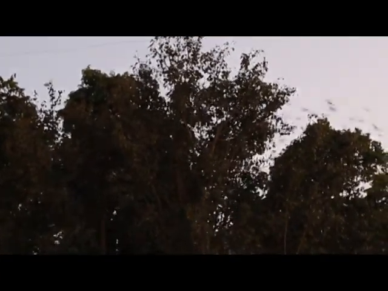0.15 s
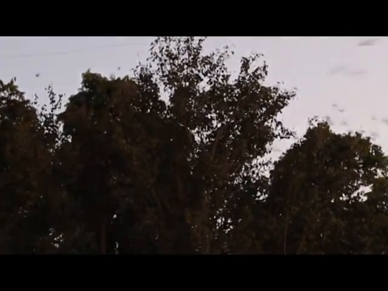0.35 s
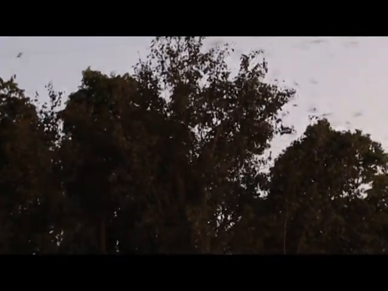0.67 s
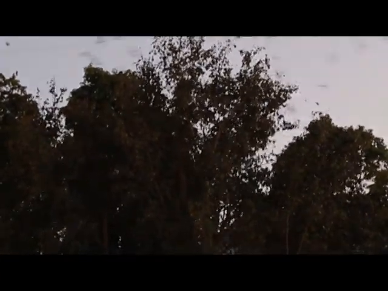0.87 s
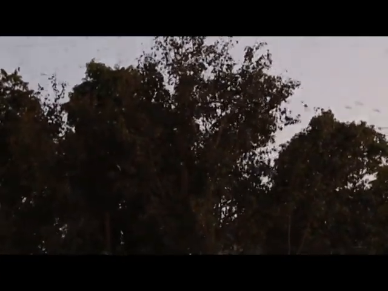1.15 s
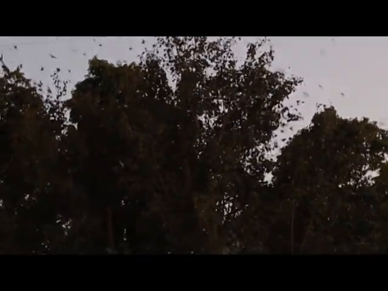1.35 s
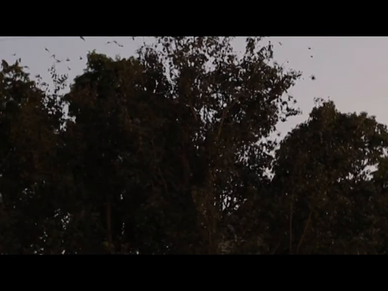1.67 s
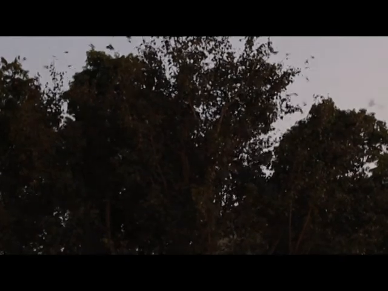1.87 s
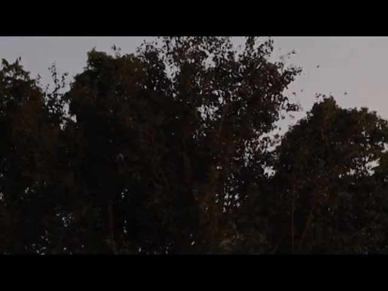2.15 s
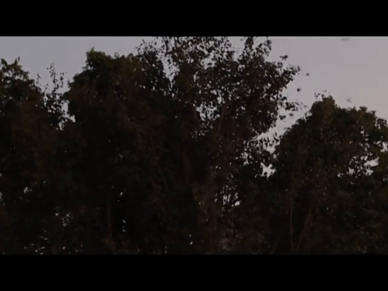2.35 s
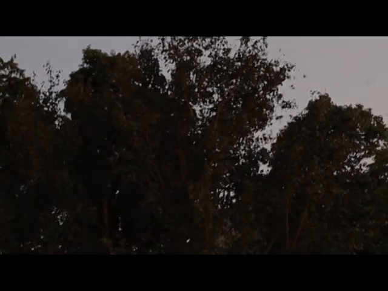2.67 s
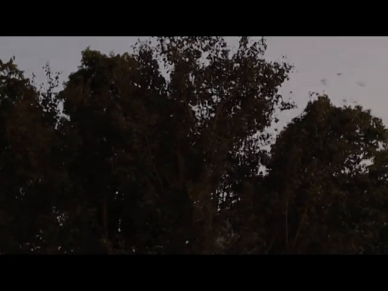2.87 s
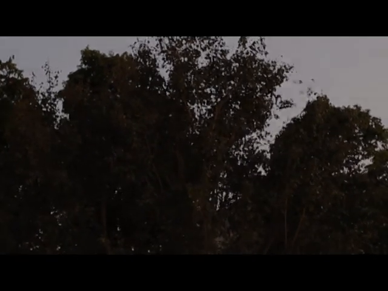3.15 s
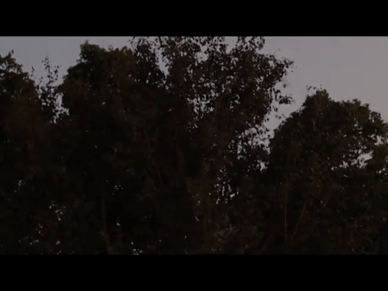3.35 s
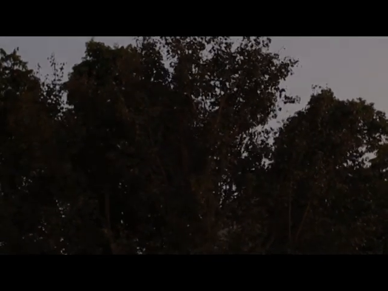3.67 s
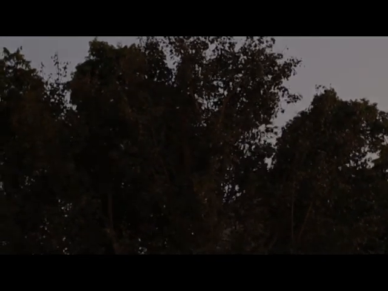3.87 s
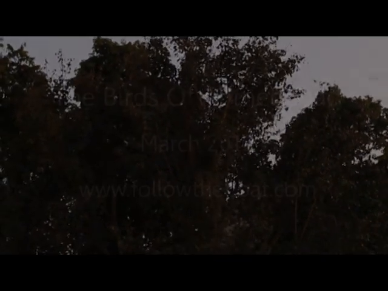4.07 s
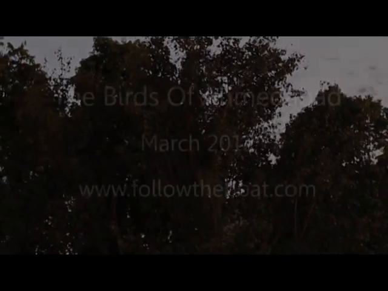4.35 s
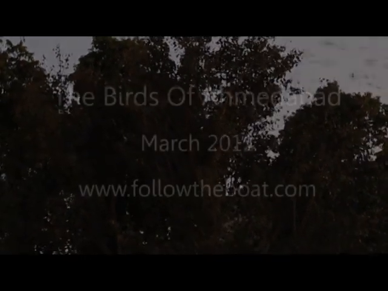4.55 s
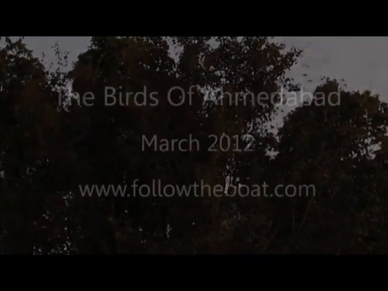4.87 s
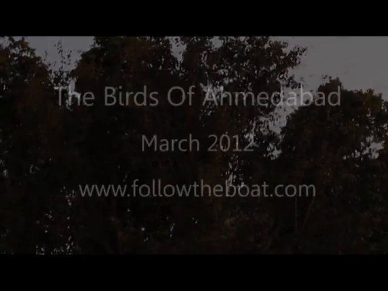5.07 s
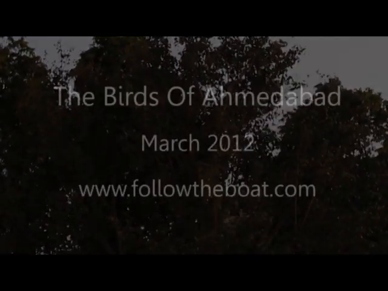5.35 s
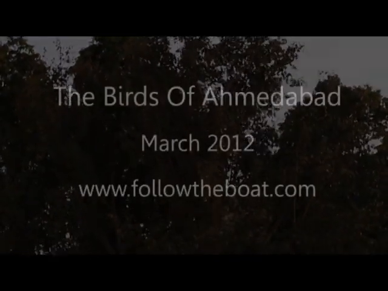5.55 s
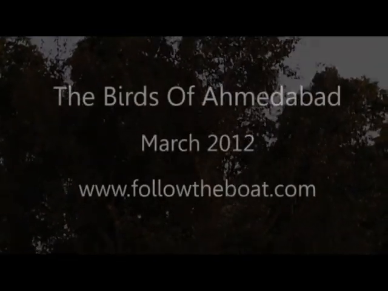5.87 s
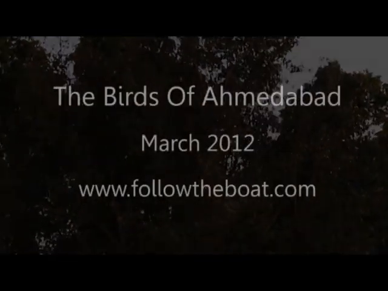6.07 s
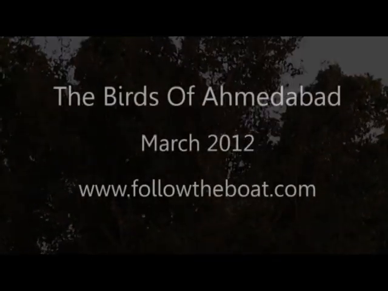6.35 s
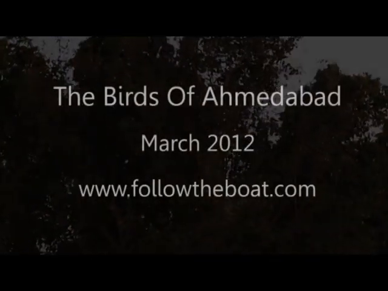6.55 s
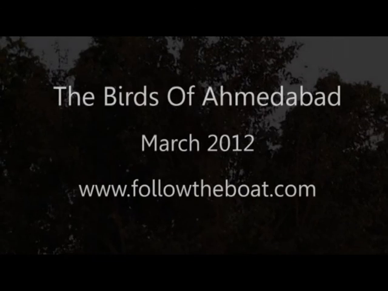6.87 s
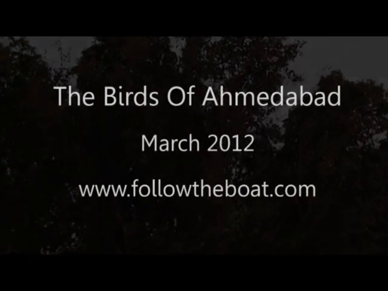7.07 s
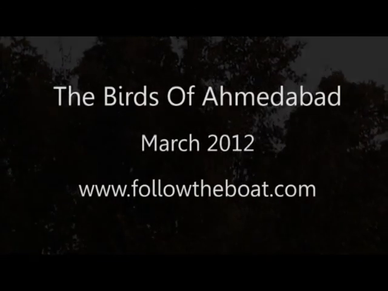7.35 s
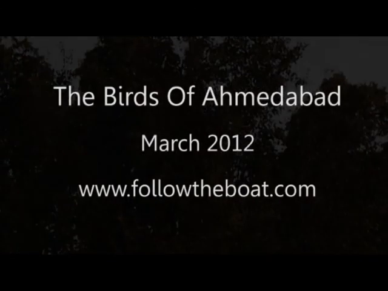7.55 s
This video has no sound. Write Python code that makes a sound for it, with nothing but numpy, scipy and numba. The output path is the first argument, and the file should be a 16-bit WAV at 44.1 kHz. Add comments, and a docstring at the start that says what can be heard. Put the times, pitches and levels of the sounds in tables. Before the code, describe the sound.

Thousands of roosting birds twitter into one bright, sizzling wash outdoors, over faint town rumble and far crows, steadily getting quieter.

```python
"""Starling roost at dusk.

Thousands of starlings, as gliding trilled sine chirps over band noise, merge into a shrill hiss.
Crows caw further off (noisy pulses through resonances) and a town rumbles (coloured noise) with faint
hoots and horns (wavering partials). Two dull bumps sag in pitch. The level dips now and then and fades down.
"""
import sys
import numpy as np
from scipy import signal
from scipy.fft import rfft, irfft, next_fast_len
from scipy.io import wavfile
from scipy.ndimage import uniform_filter1d
from numba import njit

SR = 44100
rng = np.random.default_rng(int(sys.argv[2]) if len(sys.argv) > 2 else 0)


def transcribe(signal):
    """Save signal, clipped to [-1, 1], as a 16-bit WAV file at the path in sys.argv[1]."""
    frames = np.atleast_2d(signal).T
    limited = np.clip(frames, -1, 1)
    pcm = np.round(limited * 32767).astype(np.int16)
    wavfile.write(sys.argv[1], SR, pcm)


N = 340011


def undb(db):
    """Decibels to gain."""
    return 10 ** (np.asarray(db) / 20)


def unit(x):
    """Scale to rms 1."""
    return x / np.sqrt(np.mean(x ** 2))


def colour(x, rows):
    """Shape a flat sound to a (Hz, dB) table, straight lines over log frequency; rms 1."""
    hz, db = np.transpose(rows)
    size = next_fast_len(len(x))
    bins_hz = np.arange(size // 2 + 1) * SR / size + 1  # +1 avoids log(0)
    gain = undb(np.interp(np.log(bins_hz), np.log(hz), db))
    return unit(irfft(rfft(x, size) * gain, size)[:len(x)])


def walk(rate_hz, size=N):
    """Random levels, one per 1 / rate_hz seconds, joined by ramps; spread near 1."""
    hold = int(SR / rate_hz)
    steps = np.repeat(rng.standard_normal(size // hold + 1), hold)
    return uniform_filter1d(steps, hold)[:size]


def add(out, start_s, x):
    """Mix x into out from start_s on."""
    i = int(start_s * SR)
    out[i:i + len(x)] += x[:len(out) - i]


@njit
def whistle(size, start, length, hz, sweep_hz, trill_hz, gain):
    """Sine chirps gliding by sweep_hz around hz under a smooth arch, each roughened by a trill."""
    out = np.zeros(size)
    for k in range(len(start)):
        # rotating phasors: tone z, its turn per sample, trill
        z = gain[k] + 0j
        turn = np.exp(2j * np.pi * (hz[k] - sweep_hz[k] / 2) / SR)
        glide = np.exp(2j * np.pi * sweep_hz[k] / SR / length[k])
        trill = 1 + 0j
        trill_turn = np.exp(2j * np.pi * trill_hz[k] / SR)
        for i in range(min(length[k], size - start[k])):
            u = i / length[k]
            arch = 4 * u * (1 - u)
            out[start[k] + i] += arch * z.imag * (1 + trill.real)
            z, turn, trill = z * turn, turn * glide, trill * trill_turn
    return out


# Flock spectrum. Each row: frequency in Hz, relative density in dB per Hz.
FLOCK_SPECTRUM = [(1200, -40), (2000, -26.5), (2300, -16.5), (2600, -9), (3000, -4), (3500, -3.5),
                  (4000, -1), (4400, 0.5), (5150, -3), (5850, -1), (6800, -7), (8000, -21), (10100, -40),
                  (12600, -45.5), (13500, -55)]
FLOCK_DB = -19.5  # rms before dips and fade


def flock(per_s=10000, mean_chirp_s=.02, sweep_scale_hz=1500, scatter_db=2.0, far_re_birds_db=2.1, flicker_db=0.14):
    """A dense rain of chirps at all pitches and distances over the blur of the farthest birds."""
    u = rng.random((int(per_s * N / SR), 6)).T
    start = (u[0] * N).astype(np.int64)
    hz = 1500 + 11700 * u[1]
    length = (SR * mean_chirp_s * (0.402 + 1.187 * u[2])).astype(np.int64)
    sweep_hz = sweep_scale_hz * (2 * u[3] - 1.3)  # most chirps glide down
    trill_hz = 80 + 200 * u[4]
    near = undb(-scatter_db * np.log(1 - .99 * u[5]))  # a few birds sit much closer than the rest
    birds = whistle(N, start, length, hz, sweep_hz, trill_hz, near)
    # farthest trees, smeared by foliage: plain hiss
    band = signal.butter(4, [1300, 13500], "band", fs=SR, output="sos")
    far = signal.sosfilt(band, rng.standard_normal(N))
    roost = colour(unit(birds) + undb(far_re_birds_db) * unit(far), FLOCK_SPECTRUM)
    return roost * undb(FLOCK_DB + flicker_db * walk(10))  # a very slight random level flicker


# Town spectrum. Each row: frequency in Hz, relative density in dB per Hz.
TOWN_SPECTRUM = [(13, -50), (22, -24), (45, -8), (62, -4), (72, -8), (100, -0.5), (120, -4), (190, -3.5),
                 (230, -9.5), (290, -10.5), (700, -10.5), (1200, -14.5), (1600, -10.5), (2100, -13.5),
                 (3500, -90)]
TOWN_DB = -45.5  # rms before dips and fade


def town():
    """Steady far traffic rumble: coloured noise."""
    return colour(rng.standard_normal(N), TOWN_SPECTRUM) * undb(TOWN_DB)


# Caw resonances; the rows at 3.419 and 6.496 are a second, lower throat resonance of the caw beside them.
# Each row: start in seconds, length in seconds, throat resonance in Hz,
# rms level in dB before arch, dips and fade.
CAW_RESONANCES = [(0.37, 0.27, 1770, -48), (1.074, .22, 1740, -49.5), (1.28, 0.31, 1790, -47.5),
                  (1.921, 0.19, 1590, -49.5), (2.099, 0.27, 1750, -48), (2.444, 0.18, 1790, -51),
                  (2.979, 0.27, 1770, -49), (3.384, 0.17, 1800, -46.5), (3.419, 0.16, 1400, -53),
                  (4.55, 0.15, 1800, -51), (4.713, .16, 1820, -50), (5.302, 0.27, 1800, -49),
                  (5.922, 0.15, 1750, -45), (6.5, .14, 1800, -52), (6.496, 0.17, 1380, -54.5),
                  (6.703, .16, 1530, -51)]
CAW_MEAN_HZ, THROAT_WIDTH_HZ = 442.3, 390


def crows(jitter=.08, rough=0.72):
    """Harsh caws: each row is uneven throat pulses with breath noise, through one resonance applied twice."""
    out = np.zeros(N)
    for start_s, length_s, throat_hz, db in CAW_RESONANCES:
        u = np.linspace(0, 1, int(length_s * SR))
        uneven = 1 + jitter * walk(150, size=len(u))
        pitch_arch = 1 + 0.11 * np.sin(np.pi * u) - .07
        phase = np.cumsum(CAW_MEAN_HZ * uneven * pitch_arch) / SR % 1
        breath = 1 - rough + rough * rng.standard_normal(len(u))
        voice = np.exp(-phase / 0.12) * breath
        b, a = signal.iirpeak(throat_hz, throat_hz / THROAT_WIDTH_HZ, SR)
        resonance = unit(signal.lfilter(b, a, signal.lfilter(b, a, voice)))
        add(out, start_s, undb(db) * resonance * np.sin(np.pi * u) ** 0.14)
    return out


# Partials of distant hoots and horns; 5.13 is the overtone of 5.121, 5.602 and 5.717 are upper partials
# of a horn. Each row: start in seconds, length in seconds, first pitch in Hz,
# last pitch in Hz (both before waver), peak level in dB before flutter, dips and fade.
HOOT_PARTIALS = [(1.174, .07, 637, 643, -51), (1.323, 0.47, 742, 704, -61), (1.759, 0.17, 735, 773, -52.5),
                 (2.474, 0.11, 645, 650, -51.5), (2.997, 0.13, 710, 755, -52), (2.966, .1, 603, 546, -52),
                 (3.25, 0.47, 666, 665, -62), (6.199, .46, 280, 279, -59), (5.121, 0.3, 655, 698, -54),
                 (5.13, .12, 1310, 1340, -53), (5.602, .33, 2060, 2050, -48.5),
                 (5.717, .26, 1725, 1735, -49), (7.061, 0.21, 1240, 1230, -56)]


def hoots():
    """Faint near-pure partials that waver on their long way through the air."""
    out = np.zeros(N)
    for start_s, length_s, first_hz, last_hz, db in HOOT_PARTIALS:
        u = np.linspace(0, 1, int(length_s * SR))
        waver = 1 + .006 * walk(30, size=len(u))
        flutter = undb(2.2 * walk(40, size=len(u)))
        hz = (first_hz + (last_hz - first_hz) * u) * waver
        tone = np.sin(2 * np.pi * np.cumsum(hz) / SR)
        add(out, start_s, undb(db) * flutter * tone * np.sin(np.pi * u) ** .4)
    return out


# Soft bumps near the microphone. Each row: start in seconds, first pitch in Hz,
# initial level in dB before dips and fade.
SOFT_BUMPS = [(1.194, 453, -36), (6.857, 330, -33)]
BUMP_T60_S = 0.057


def bumps(sag_s=0.0077):
    """Short dull knocks whose pitch sags at once, halving in sag_s."""
    out, t = np.zeros(N), np.arange(SR // 5) / SR
    for start_s, first_hz, db in SOFT_BUMPS:
        cycles = np.cumsum(first_hz / (1 + t / sag_s)) / SR
        add(out, start_s, undb(db) * np.sin(2 * np.pi * cycles) * 1000 ** (-t / BUMP_T60_S))
    return out


def scene():
    """One microphone feeds both channels."""
    return np.tile(flock() + town() + crows() + hoots() + bumps(), (2, 1))


# Level dips. Each row: time of drop in seconds, depth in dB.
LEVEL_DIPS = [(0.245, -1.5), (2.11, -1), (4.9, -0.5), (5.28, -0.6), (6.7, -0.9), (7.249, -0.8)]
RECOVER_S, SWELL_S, SWELL_DB = 0.54, 0.022, 1  # time constants; rise just before each drop
FADE_ENDS_S = 9.02  # the straight-line fade would reach silence here
TOP_HZ = 12785


def record(dry):
    """The level swells briefly, drops at once and creeps back; then the long fade and a steep treble cut."""
    t = np.arange(N) / SR
    dip_db = np.zeros(N)
    for drop_s, depth_db in LEVEL_DIPS:
        away_s = np.abs(t - drop_s)
        swell = SWELL_DB * np.exp(-away_s / SWELL_S)
        recovery = depth_db * np.exp(-away_s / RECOVER_S)
        dip_db += np.where(t >= drop_s, recovery, swell)
    faded = dry * undb(dip_db) * (1 - t / FADE_ENDS_S)
    return signal.sosfilt(signal.ellip(10, .2, 80, TOP_HZ, fs=SR, output="sos"), faded)


dry = scene()
out = record(dry)
transcribe(out)
```